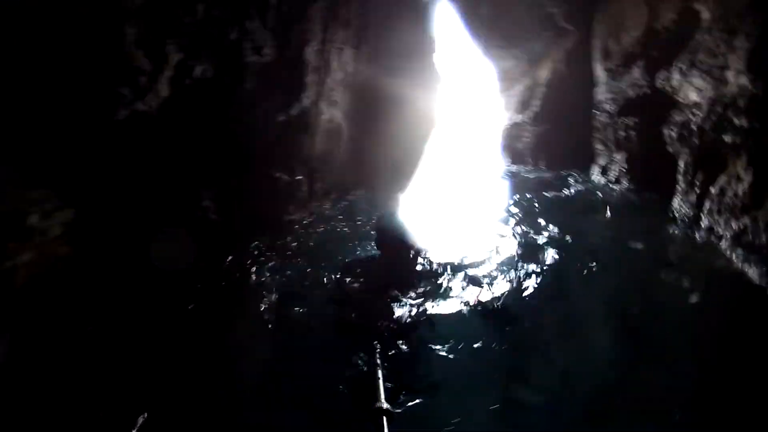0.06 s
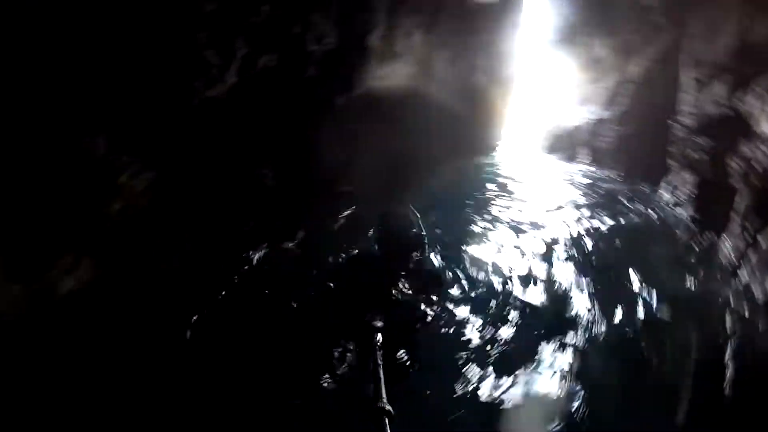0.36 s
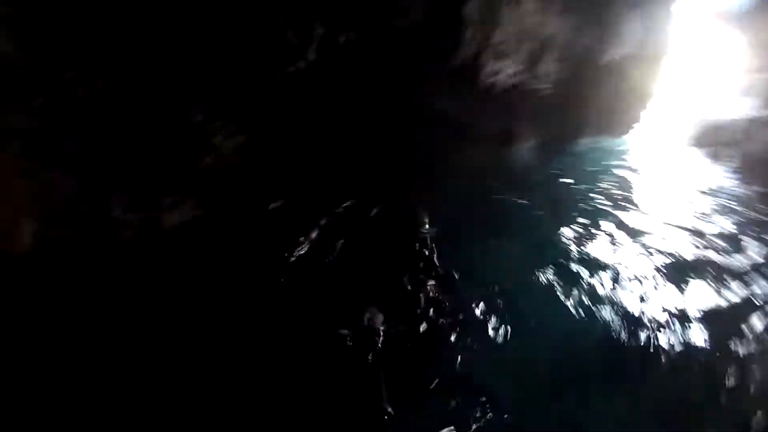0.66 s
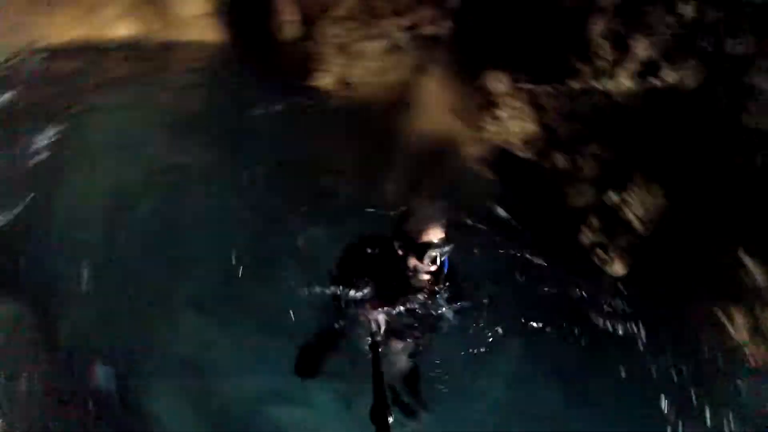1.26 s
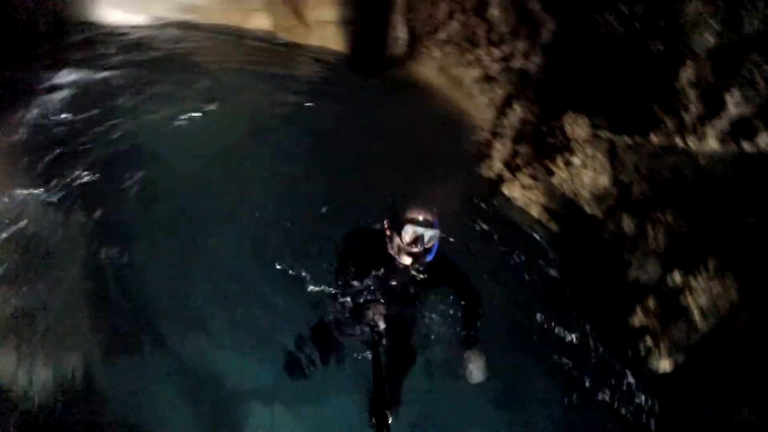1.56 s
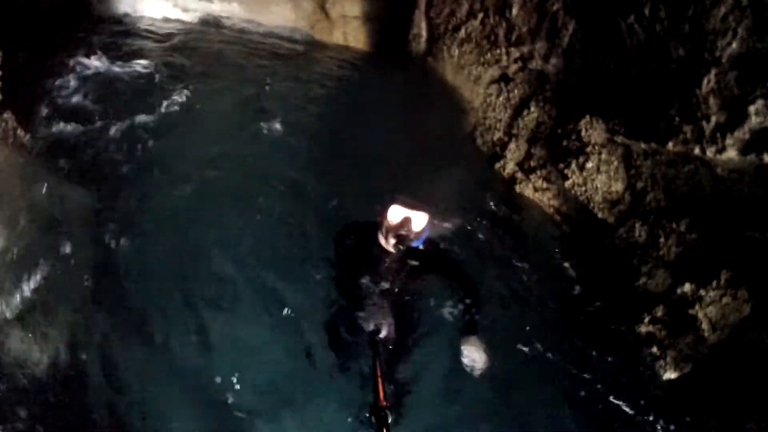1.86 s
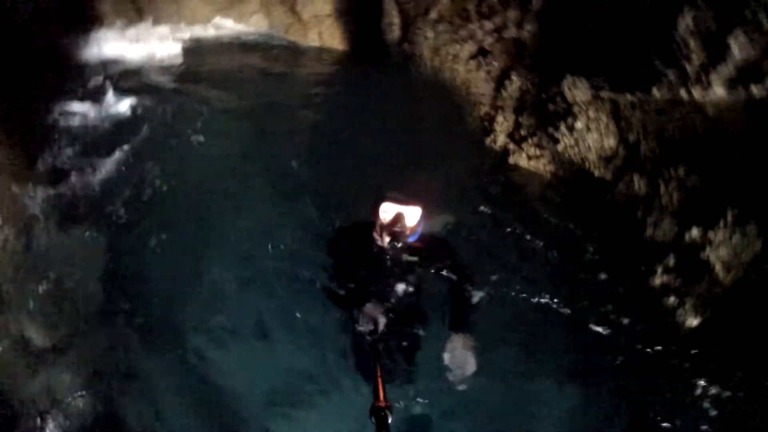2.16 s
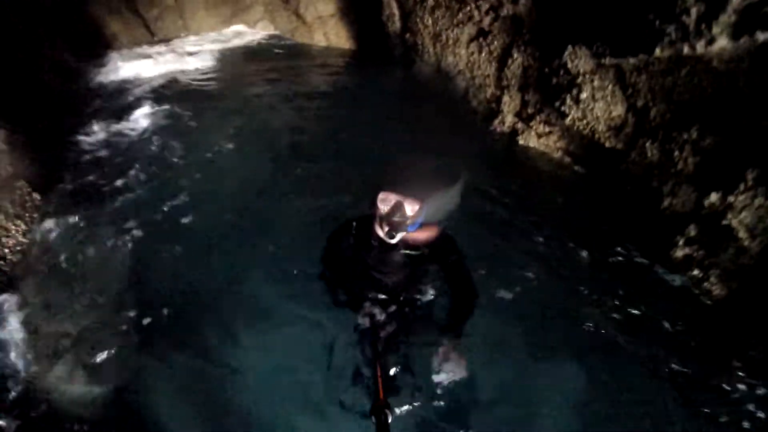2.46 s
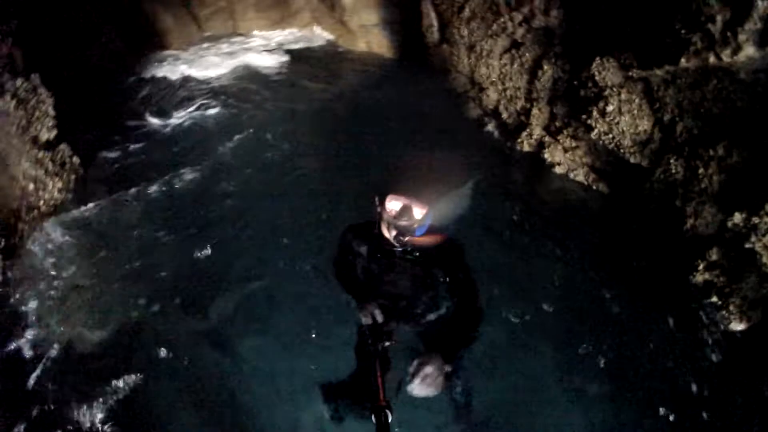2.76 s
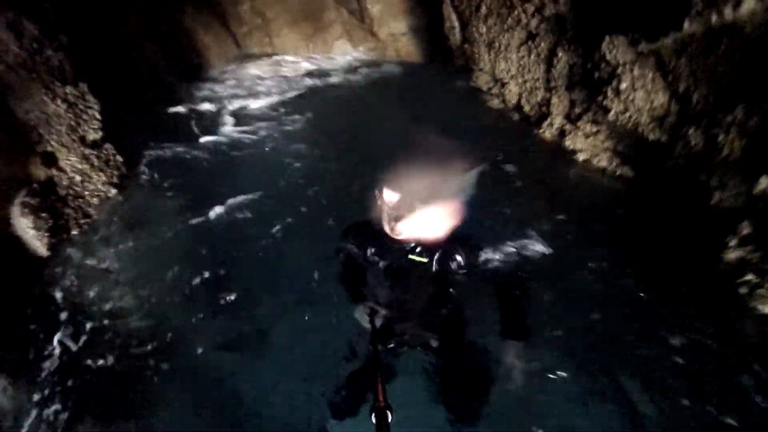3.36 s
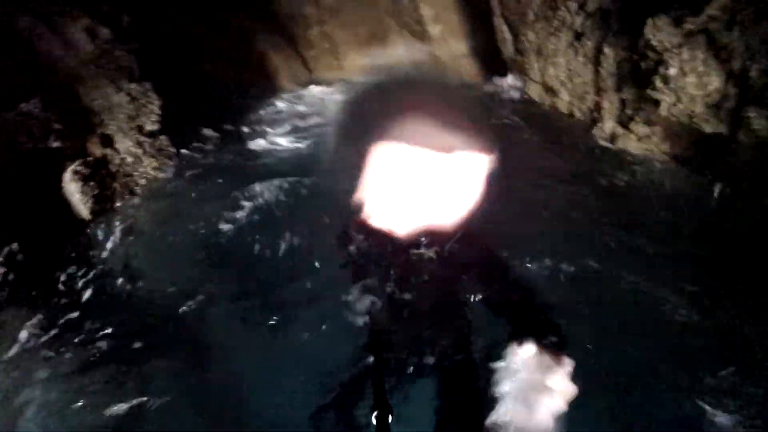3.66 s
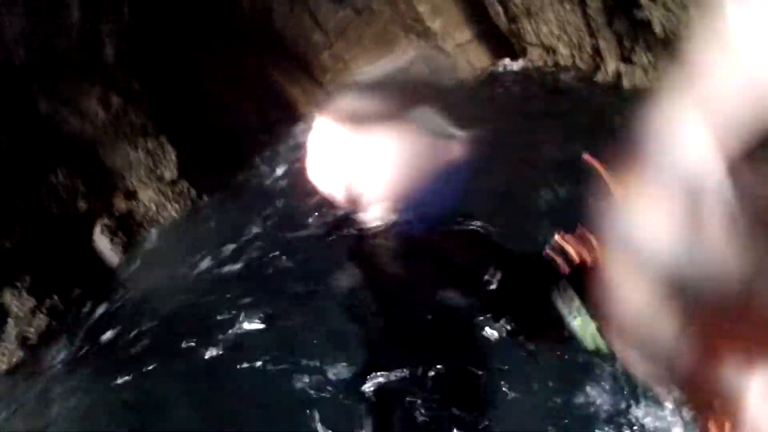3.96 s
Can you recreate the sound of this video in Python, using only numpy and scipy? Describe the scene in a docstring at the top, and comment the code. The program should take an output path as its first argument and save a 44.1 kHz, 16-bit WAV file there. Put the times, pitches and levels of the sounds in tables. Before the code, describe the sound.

Seawater washes and laps inside a rocky cave, with low booms and drops plinking close by. A surge sloshes and drains as fizzing foam, then water slaps the microphone just above the surface, lightly at first and hard at the end.

```python
"""Seawater heaves in a sea cave, heard from a camera in a waterproof housing on a pole above the surface.
Over a steady wash and a low rumble, spray crackles, the swell booms in the rock and drops plink
close by, each leaving a ringing bubble. Around 1 s a surge laps and sloshes at the rock, then drains
as fizzing foam, loudest near 1.8 s. From 3.1 s the lapping returns and water slaps the housing,
lightly at first and hard just before 4 s, setting the pole ringing. The walls echo the close sounds."""
import sys
import numpy as np
from scipy import signal
from scipy.fft import rfft, irfft
from scipy.io import wavfile
from scipy.ndimage import uniform_filter1d

SR = 44100
rng = np.random.default_rng(int(sys.argv[2]) if len(sys.argv) > 2 else 0)


def put_to_file(sound):
    """Save the sound as 16-bit audio at rate SR, in the file named by the first command-line argument."""
    columns = np.atleast_2d(sound).T  # one column per channel
    safe = np.clip(columns, -1, 1)
    whole_steps = np.round(safe * 32767)
    wavfile.write(sys.argv[1], SR, whole_steps.astype(np.int16))


N = 176400


def undb(db):
    return 10 ** (np.asarray(db) / 20)


def unit_rms(x):
    return x / np.sqrt(np.mean(x ** 2) + 1e-20)


def unit_peak(x):
    return x / (np.abs(x).max() + 1e-20)


def gain_curve(rows):
    """Gain along (t/s, level/dB) points."""
    return undb(np.interp(np.arange(N) / SR, *np.array(rows).T))


def arch(start_s, length_s):
    """Half-sine envelope."""
    return np.sin(np.pi * np.clip((np.arange(N) / SR - start_s) / length_s, 0, 1))


def decay(t, t60_s):
    return np.exp(-np.log(1000) * t / t60_s)


def add(out, start_s, x):
    i = int(np.clip(start_s * SR, 0, N - 1))
    out[i:i + len(x)] += x[:N - i]


def colour(x, spectrum):
    """Filter by (f/Hz, level/dB) points, rolled off below the lowest; rms 1."""
    hz, db = np.array(spectrum).T
    f = np.fft.rfftfreq(N, 1 / SR) + 1e-3
    gain = undb(np.interp(np.log(f), np.log(hz), db))
    low_cut = np.minimum(f / hz[0], 1) ** 2
    return unit_rms(irfft(rfft(x) * gain * low_cut, N))


def lowpass(x, hz):
    return signal.sosfilt(signal.butter(2, hz, fs=SR, output="sos"), x)


def band(x, hz, width_hz):
    """Gaussian band-pass; rms 1."""
    f = np.fft.rfftfreq(N, 1 / SR)
    bell = np.exp(-.5 * ((f - hz) / width_hz * 2) ** 2)
    return unit_rms(irfft(rfft(x) * bell, N))


def wander(rate_hz):
    """Smoothed random steps; rms 1."""
    hold = int(SR / rate_hz)
    steps = rng.standard_normal(1024)
    return unit_rms(uniform_filter1d(steps[np.arange(N) // hold % len(steps)], hold))


def churn(flicker_db, rate_hz):
    """White noise in 14 independently flickering bands."""
    spectrum = rfft(rng.standard_normal(N))
    band_of_bin = np.digitize(np.fft.rfftfreq(N, 1 / SR), np.geomspace(120, 10000, 13))
    bands = (irfft(spectrum * (band_of_bin == k), N) for k in range(14))
    return sum(noise * undb(flicker_db * wander(rate_hz)) for noise in bands)


def ring(hz, t60_s, rise_cycles, glide_per_s=0.):
    """Damped sine with soft onset and optional glide; peak 1."""
    t = np.arange(int(max(t60_s, .002) * SR * 2)) / SR
    onset = 1 - np.exp(-(t * hz / rise_cycles) ** 2)
    phase = 2 * np.pi * hz * t * (1 + glide_per_s * t / 2)
    return unit_peak(onset * decay(t, t60_s) * np.sin(phase))


def burst(t60_s):
    """Decaying noise; peak 1."""
    t = np.arange(SR // 10) / SR
    return unit_peak(rng.standard_normal(len(t)) * decay(t, t60_s))


def bubbles(per_s, low_hz, high_hz, t60_cycles, spread_db, max_count):
    """Random swarm of bubbles, each rising in pitch as it fades."""
    out = np.zeros(N)
    for when, pitch, faintness, life in rng.random((max_count, 4))[:int(per_s * N / SR)]:
        hz = low_hz * (high_hz / low_hz) ** pitch
        t60_s = t60_cycles * (.5 + life) / hz
        gain = hz * undb(-spread_db * np.log(faintness + 0.012))
        add(out, when * N / SR, gain * ring(hz, t60_s, rise_cycles=1, glide_per_s=0.11 / t60_s))
    return out


def pops(per_s, spread_db):
    """Random clicks of uneven size."""
    clicks = (rng.random(N) < per_s / SR) * rng.choice([-1, 1], N)
    return clicks * undb(spread_db * np.minimum(rng.exponential(size=N), 4))


# wash spectrum: f/Hz, relative level/dB
WASH_SPECTRUM = [(60, 2), (85, -7.5), (115, -5), (145, -21), (175, -7.5), (230, -11), (450, -12.5),
                 (800, -15.5), (1350, -16), (1680, -10.5), (2000, -16.5), (2800, -14.5), (3600, -24.5),
                 (4600, -15), (5300, -24), (6100, -22.5), (7100, -33), (9700, -32), (11200, -36.5),
                 (12700, -29), (15000, -44)]


def wash():
    """Distant water churns steadily."""
    return undb(-63.5) * colour(churn(flicker_db=2.05, rate_hz=12), WASH_SPECTRUM)


# rumble envelope: t/s, level/dB
RUMBLE_ENVELOPE = [(0, -76), (.5, -53), (1.45, -55), (1.7, -60), (2.45, -57), (2.62, -47.5), (3, -59.5),
                   (4, -51.5)]


def rumble():
    """Heaving water: a swelling low noise band over a steady deeper one."""
    swelling = gain_curve(RUMBLE_ENVELOPE) * band(rng.standard_normal(N), hz=34.4, width_hz=19.3)
    heave = undb(-51.5) * band(rng.standard_normal(N), hz=16.4, width_hz=5.5)
    return swelling + heave


# lapping spectrum: f/Hz, relative level/dB
LAP_SPECTRUM = [(70, -12), (115, 9.5), (145, 5.5), (175, 5), (260, -4.5), (450, -4), (800, -13),
                (1150, -14), (1600, -14.5), (2200, -15), (3500, -23.5), (7000, -60)]
# lapping envelope: t/s, level/dB
LAP_ENVELOPE = [(0, -72), (.12, -60.5), (.35, -67), (.7, -67.5), (.9, -58.5), (1.08, -56), (1.19, -52.5),
                (1.33, -62), (1.6, -64.5), (1.85, -68), (2.2, -72.5), (2.8, -79), (3.1, -61), (3.3, -69.5),
                (3.45, -60), (3.65, -60), (3.8, -66), (4, -47.5)]


def lapping():
    """The surge churns against the rock and gurgles with bubbles."""
    gurgle = bubbles(per_s=260, low_hz=195, high_hz=3110, t60_cycles=15, spread_db=4, max_count=3000)
    water = churn(flicker_db=-1.5, rate_hz=22)
    surge = colour(water, LAP_SPECTRUM) + undb(-7) * colour(gurgle, LAP_SPECTRUM)
    return gain_curve(LAP_ENVELOPE) * surge


# foam spectrum: f/Hz, relative level/dB
FOAM_SPECTRUM = [(300, -3), (1000, -14), (1700, -8.5), (2800, -8.5), (3500, -13.5), (4150, -6.5),
                 (4620, -0.5), (5250, -6.5), (6100, -7), (7100, -15.5), (9700, -12.5), (11200, -17.5),
                 (12700, -15.5), (15000, -19)]
# foam envelope: t/s, level/dB
FOAM_ENVELOPE = [(0, -69.5), (.25, -72), (.4, -67.5), (.65, -68), (.9, -61.5), (1.15, -61.5), (1.35, -61.5),
                 (1.6, -58.5), (1.82, -55.5), (2, -59), (2.2, -65), (2.5, -71), (3.2, -68), (3.45, -64.5),
                 (3.75, -67.5), (4, -65.5)]


def foam():
    """Foam hisses and fizzes as the water drains."""
    hiss = colour(churn(flicker_db=0.46, rate_hz=18), FOAM_SPECTRUM)
    fizz = colour(pops(per_s=3000, spread_db=2.6), FOAM_SPECTRUM)
    return gain_curve(FOAM_ENVELOPE) * (hiss + undb(-8.5) * fizz)


# spray patches: t/s, length/s, centre f/Hz, width/Hz, level/dB
SPRAY_PATCHES = [(0.013, 0.027, 4800, 2500, -66.5), (.31, 0.23, 4700, 700, -67.5),
                 (3.1425, 0.0048, 6160, 1800, -53), (3.37, 0.13, 4800, 1300, -65),
                 (3.426, .045, 10500, 6000, -72), (3.53, 0.007, 7000, 3500, -63),
                 (3.638, 0.014, 6240, 1800, -63.5), (3.828, 0.12, 7500, 3000, -70.5),
                 (3.921, 0.0064, 8340, 2500, -60), (3.943, 0.0054, 7300, 1100, -56)]


def spray():
    """Fine spray crackles as tiny droplets land."""
    droplets = pops(per_s=1500, spread_db=5)
    return sum(undb(db) * arch(start_s, length_s) * band(droplets, hz, width_hz)
               for start_s, length_s, hz, width_hz, db in SPRAY_PATCHES)


def cave_echo(x):
    """The rock walls return a dull, diffuse tail."""
    t = np.arange(SR) / SR
    onset = np.minimum(t / 0.013, 1)
    tail = lowpass(rng.standard_normal(SR), hz=3000) * decay(t, t60_s=1) * onset
    return signal.fftconvolve(x, tail / np.sqrt(np.sum(tail ** 2)))[:N]


# swell booms: t/s, length/s, f/Hz, level/dB
SWELL_BOOMS = [(.03, 0.29, 164.8, -56.5), (0.285, 0.43, 71.5, -49), (0.738, 0.19, 68.5, -52.5)]


def booms(attack_s=0.098):
    """The swell sounds low, hollow tones in the rock."""
    out = np.zeros(N)
    for start_s, length_s, hz, db in SWELL_BOOMS:
        t = np.arange(int(length_s * SR)) / SR
        onset = np.minimum(t / attack_s, 1)
        fade = np.sin(np.pi / 2 * np.minimum(1.06 * (1 - t / length_s), 1))
        add(out, start_s, undb(db) * onset * fade * np.sin(2 * np.pi * hz * t))
    return out


# close drops: t/s, bubble f/Hz, level/dB, t60/s
CLOSE_DROPS = [(0.1669, 864, -44, 0.044), (0.172, 3000, -53, 0.0088), (.182, 3100, -50.5, 0.011),
               (0.2481, 2240, -43, 0.025), (0.2502, 2780, -39, 0.019), (0.2504, 3200, -44, 0.016),
               (.2848, 3270, -48, 0.0097), (.3015, 2200, -45, 0.021), (0.799, 887, -56, 0.078),
               (.858, 2380, -42, .009), (1.008, 2900, -40.5, 0.0057), (1.1065, 4680, -43, 0.016),
               (1.115, 1150, -48, 0.049), (1.13, 2200, -46, 0.022), (1.172, 1050, -42, 0.0084),
               (1.178, 2150, -49, .04), (1.206, 665, -53, 0.024), (1.22, 2250, -48, 0.016),
               (1.256, 724, -48, 0.023), (1.287, 2030, -47.5, .03), (1.413, 1135, -54, 0.039),
               (1.466, 1060, -54, .05), (1.478, 2070, -42.5, 0.024), (1.4857, 2300, -47.5, 0.016),
               (3.01, 2400, -52.5, 0.015), (3.303, 2214, -39.5, 0.029), (3.427, 2900, -53, 0.0079),
               (3.448, 2450, -45.5, .014), (3.45, 3600, -48, .012), (3.546, 3060, -44, 0.01),
               (3.567, 1213, -42.5, 0.03), (3.5644, 2180, -48.5, 0.0082), (3.7541, 2840, -43.5, 0.0099),
               (3.787, 1420, -48.5, 0.036), (3.8069, 3140, -46, 0.031), (3.876, 1170, -48, 0.056),
               (3.879, 4300, -51, .015), (3.927, 2390, -50, 0.036), (3.953, 3000, -31, 0.0086),
               (3.957, 3750, -40, 0.011), (3.983, 2330, -35, 0.022)]


def drops():
    """Each drop splats on the surface and leaves a ringing bubble; the level wobbles."""
    out = np.zeros(N)
    wobble = 1 + 0.26 * unit_rms(lowpass(rng.standard_normal(N), hz=350))
    for start_s, hz, db, t60_s in CLOSE_DROPS:
        bubble = ring(hz, t60_s, rise_cycles=2.4, glide_per_s=1.1)
        splat = 0.24 * unit_peak(lowpass(burst(t60_s=0.049), 1.25 * hz))
        add(out, start_s, undb(db) * bubble)
        add(out, start_s, undb(db) * splat)
    return out * wobble


# slosh spectrum: f/Hz, relative level/dB
SLOSH_SPECTRUM = [(300, 9), (650, -5.5), (1150, -0.5), (1600, -5.5), (2150, 3.5), (2800, -14.5), (3600, 2),
                  (6000, -30)]
# sloshes: t/s, length/s, level/dB
ROCK_SLOSHES = [(.82, .14, -64.5), (1.091, 0.18, -59.5), (3.404, .08, -61.5), (3.969, 0.083, -37)]


def sloshes():
    """Water sloshing on the rock releases crowds of short-lived bubbles."""
    crowd = bubbles(per_s=950, low_hz=425, high_hz=3000, t60_cycles=8, spread_db=0.5, max_count=4000)
    envelope = sum(undb(db) * arch(start_s, length_s) for start_s, length_s, db in ROCK_SLOSHES)
    return envelope * colour(crowd, SLOSH_SPECTRUM)


# housing shell modes: f/Hz, relative level/dB, t60/s
SHELL_MODES = [(1300, -2.5, 0.012), (2061, 6, 0.01), (2900, -6, 0.018), (3800, -2, 0.015), (4400, -19, .01),
               (6000, -21, 0.0061), (7000, -6, 0.0055)]


def shell_clack(cutoff_hz):
    """A splat plus the shell's modes, randomly detuned per hit; peak 1."""
    clack = undb(7.5) * burst(t60_s=0.015)
    for k, (hz, db, t60_s) in enumerate(SHELL_MODES):
        detune = 1 + 0.045 * rng.standard_normal()
        mode = ring(hz * detune, t60_s, rise_cycles=1.8)
        clack[:len(mode)] += (-1) ** k * undb(db) * mode
    return unit_peak(lowpass(clack, cutoff_hz))


# slaps: t/s, pocket f/Hz, pocket level/dB, pocket t60/s,
# shell level/dB, shell cutoff f/Hz, thud level/dB, pole level/dB
HOUSING_SLAPS = [(3.1447, 727, -29.5, 0.016, -33, 4130, -47, -46),
                 (3.533, 513, -32, 0.0098, -47.5, 2000, -39.5, -48.5),
                 (3.643, 920, -59, .02, -53, 8000, -46, -53.5),
                 (3.9444, 660, -15.5, 0.012, -19.5, 2730, -32.5, -39.5),
                 (3.95, 470, -22, .06, -29, 1500, -16.5, -33),
                 (3.9705, 603, -53, 0.016, -35.5, 3800, -47, -30),
                 (3.981, 595, -50, 0.029, -43, 3500, -50, -34),
                 (3.9928, 636, -14.5, 0.011, -18.5, 3100, -23.5, -45)]
# pole modes: f/Hz, relative level/dB, t60/s
POLE_MODES = [(110.4, -0.28, 0.37), (168.5, -2, 0.35)]


def slaps(rebound_s=0.01503, rebound_db=-5):
    """Water hits: the shell clacks, trapped air rings, the camera thuds and rebounds, the pole hums."""
    out = np.zeros(N)
    for start_s, pocket_hz, pocket_db, t60_s, shell_db, cutoff_hz, thud_db, pole_db in HOUSING_SLAPS:
        add(out, start_s, undb(shell_db) * shell_clack(cutoff_hz))
        add(out, start_s, -undb(pocket_db) * ring(pocket_hz, t60_s, rise_cycles=0.54))
        thud = undb(thud_db) * ring(hz=111, t60_s=0.024, rise_cycles=.2)
        add(out, start_s, -thud)
        add(out, start_s + rebound_s, undb(rebound_db) * thud)
        for hz, db, mode_t60_s in POLE_MODES:
            add(out, start_s, -undb(pole_db + db) * ring(hz, mode_t60_s, rise_cycles=1))
    return out


def scene():
    """Close sounds and their echo over the moving water; mono."""
    close = drops() + slaps() + sloshes() + spray()
    echo = undb(-23.5) * cave_echo(close)
    water = lapping() + foam() + wash() + rumble() + booms()
    return (close + echo + water)[None]


def record(dry):
    """Steep treble cut."""
    cutoff_hz = 15300
    return signal.sosfilt(signal.ellip(10, .2, 70, cutoff_hz, fs=SR, output="sos"), dry)


dry = scene()
out = record(dry)
put_to_file(out)
```